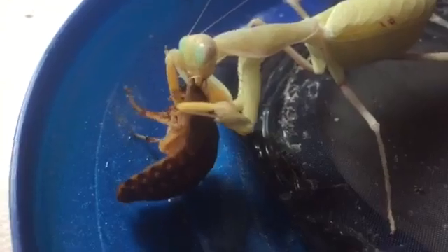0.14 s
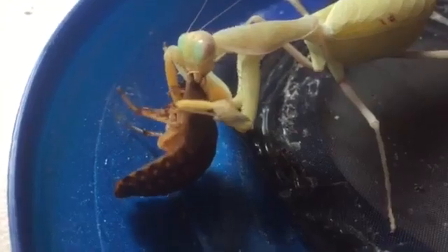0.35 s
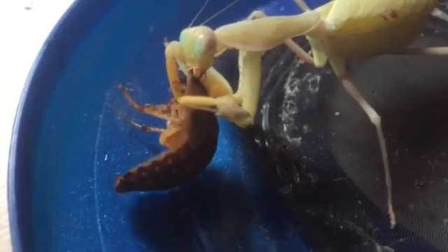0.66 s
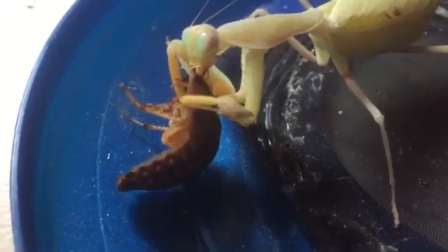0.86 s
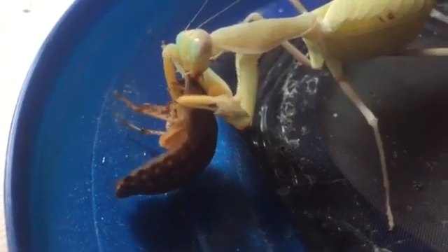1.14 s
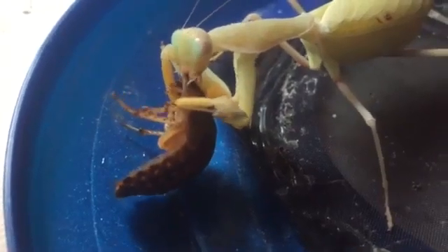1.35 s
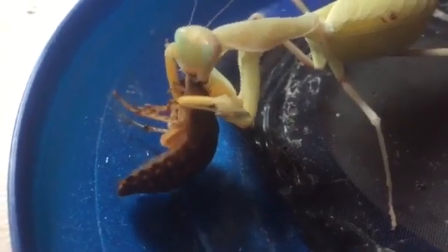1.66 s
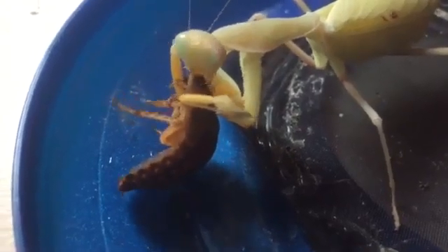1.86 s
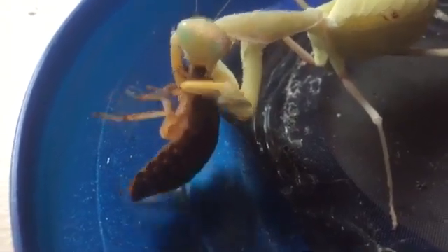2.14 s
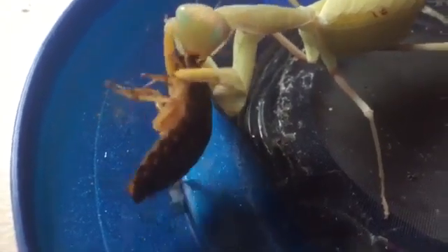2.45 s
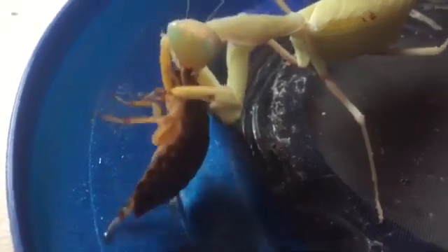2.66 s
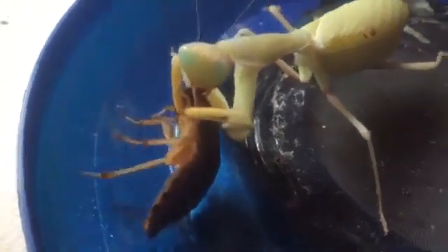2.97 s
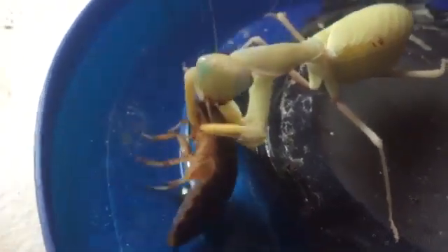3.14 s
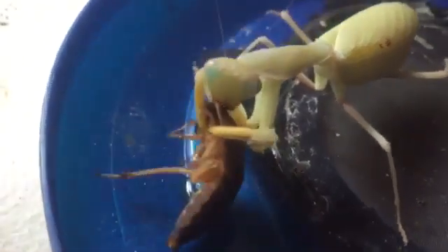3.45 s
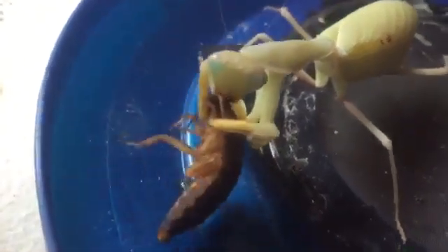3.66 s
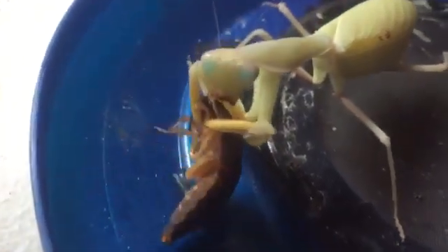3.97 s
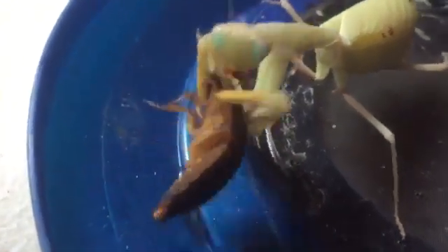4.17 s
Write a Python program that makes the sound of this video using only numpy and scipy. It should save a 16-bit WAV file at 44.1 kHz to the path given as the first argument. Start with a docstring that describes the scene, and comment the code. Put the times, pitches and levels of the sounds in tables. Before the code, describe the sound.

A mantis chews a struggling cockroach in a small plastic dish, captured very close in a quiet room. From the start to 0.25 seconds, several tiny, bright, brittle snaps come in quick succession; single ones follow near 0.5 and 0.75, then a small cluster at 1.1 to 1.2. Each is very short, with a slight ring of the dish. Until 2.2 only the background remains. Legs then tap and slip in a rapid flurry at 2.25 to 2.35, and again around 2.7, woodier and lower than the snaps. Sparse, very faint ticks follow; a dull soft table knock comes at 3.6. The loudest sharp cracks burst out at 3.85, followed by taps at 3.95 to 4.0 and one faint tick near 4.3. Faint grainy crackle swells around the clicks. A low, wavering rumble with uneven hum, a mid-range airy rush and thin microphone hiss run throughout.

```python
"""A mantis chews a struggling cockroach in a small plastic dish, heard from very close.
Bright snaps of breaking shell come first, ringing the dish briefly, with two dull knocks through the table;
after a pause legs tap and slip in quick flurries, then the loudest snaps lead to a last group of taps.
Throughout, random grains make a faint noise that rises around the clicks; filtered noise makes a mid-range
rush of air and microphone hiss, and a fluctuating sine with noise bands makes a low uneven rumble."""
import sys
import numpy as np
from scipy import signal
from scipy.fft import rfft, irfft, next_fast_len
from scipy.io import wavfile
from scipy.ndimage import uniform_filter1d

SR = 44100
rng = np.random.default_rng(int(sys.argv[2]) if len(sys.argv) > 2 else 0)


def generate_wav(sig):
    """Save sig (samples, or channels by samples) to the path in sys.argv[1] as 16-bit PCM at SR."""
    pcm = np.round(np.clip(np.atleast_2d(sig).T, -1, 1) * 32767).astype(np.int16)
    wavfile.write(sys.argv[1], SR, pcm)


def attenuation_scalar(level_db):
    """Turn a level in dB into a linear amplitude multiplier (20 dB per decade)."""
    decades = np.asarray(level_db, float) / 20
    return 10 ** decades


N = 190011

# jaws breaking shell: start_s, level_db, ring_hz, dish_db (relative to the crack)
SHELL_SNAPS = [(0.0626, -32, 10560, -15.5), (0.0687, -41.5, 6960, -17), (0.0924, -34, 9900, -35),
               (0.1424, -35.5, 11300, -18), (0.2424, -26.5, 12200, -21), (0.2515, -39, 9200, -10),
               (0.4661, -30.5, 10400, -21), (0.7561, -35, 9920, -25), (1.0828, -36.5, 11730, -9),
               (1.1634, -28.5, 11400, -34), (1.1656, -33, 9800, -17), (1.208, -43, 9180, -15),
               (1.2111, -47.5, 9430, -7), (2.2985, -42, 7400, -28), (2.3148, -44.5, 11100, -30),
               (2.6968, -31.5, 3480, -7), (2.6978, -35.5, 7650, -20), (2.877, -53, 12750, -6),
               (3.8436, -22.5, 9400, -15.5), (3.8437, -29, 12800, -25), (3.8527, -28, 8730, -30),
               (3.8814, -46, 9230, -22), (3.9921, -53, 6360, -22)]
# legs on the dish: start_s, level_db, favoured_hz, contact_ms, breadth_octaves (favour 6 dB down)
LEG_TAPS = [(2.239, -46, 3210, 2.16, 0.57), (2.2457, -40, 2800, 0.5, 0.38),
            (2.2619, -47.5, 4020, 0.44, 0.63), (2.2983, -32.5, 3350, 0.36, 0.32),
            (2.3045, -47, 4200, 1.1, 0.2), (2.3113, -45, 3900, 2.2, 0.2), (2.3146, -30, 3770, 1.15, 0.11),
            (2.3336, -52, 3360, 0.8, 0.33), (2.576, -52.5, 2490, 1.9, 0.81), (2.654, -59, 3517, 2.2, 0.32),
            (2.671, -43, 3190, 0.5, 0.21), (2.6925, -39, 5050, 2.7, 0.12), (2.6945, -36.5, 4000, 2.1, 0.25),
            (2.6958, -33, 3100, 1.1, 0.23), (2.6968, -42, 2050, 0.55, 0.3),
            (2.7972, -60.5, 2317, 0.55, 0.3), (3.2428, -55.5, 2580, 0.42, 0.49),
            (3.3856, -58, 4086, 9, 0.2), (3.5942, -47, 2330, 0.54, 0.96), (3.804, -55, 3270, 3.8, 0.37),
            (3.9318, -40, 2630, 0.93, 0.74), (3.934, -36, 4460, 3.6, 0.12), (3.937, -48, 4470, 1.8, 0.2),
            (3.9345, -37, 2400, 2.3, 0.18), (3.9384, -34, 2410, 2, 0.13), (3.9993, -37.5, 3050, 2.2, 0.09),
            (4.001, -50, 5900, 1.92, 0.14), (4.0049, -39, 3080, 1.3, 0.09), (4.286, -56, 2230, 0.57, 0.16)]
# free modes of the dish: mode_hz, mean_level_db, t60_s
DISH_MODES = [(2100, 1, 0.034), (2372, 5, 0.052), (3123, 3.5, 0.065), (3058, 2.5, 0.009), (3785, 5, 0.014),
              (4000, 9, 0.019), (4262, -1, 0.065), (5120, -7.5, 0.0067), (5050, 6.5, 0.034),
              (5900, 9, 0.014), (7400, 9, 0.02)]
# soft bumps through the table: start_s, level_db, favoured_hz
TABLE_KNOCKS = [(0.093, -60, 392), (1.213, -72, 960), (3.596, -44, 260.2)]
# modes of the table: mode_hz, level_db, t60_s
TABLE_MODES = [(252, 0, 0.085), (414, 2.5, 0.065), (556, 0, 0.053), (960, 11.5, 0.17)]
# uneven, sometimes abrupt level changes of two low noise bands: time_s, upper_level_db, drone_level_db
BAND_LEVELS = [(0.0, -52, -62), (0.14, -70, -69), (0.17, -60, -64), (1.26, -61.5, -64), (1.32, -57, -58),
               (1.7, -59, -58), (1.79, -64, -74), (1.84, -57, -62), (2.9, -61, -66), (3.56, -60.5, -60.5),
               (3.6, -56, -52.5), (3.68, -57.5, -73), (3.73, -67, -53.5), (3.83, -56, -68.5),
               (3.86, -69, -61), (4.06, -50, -57), (4.09, -57, -69), (4.31, -57.5, -66)]
# chance fluctuations of a narrow low rumble near 76 Hz: time_s, rms_db, pitch_hz, half_width_s (to 1/e)
RUMBLE_FLUCTUATIONS = [(0.03, -50, 84, 0.09), (0.12, -46, 83, 0.027), (0.34, -48, 82.25, 0.047),
                       (0.502, -44.5, 73.65, 0.016), (0.601, -43, 80.3, 0.038),
                       (0.759, -44.5, 78.24, 0.017), (0.83, -44.5, 79.8, 0.024), (1.021, -48, 80.24, 0.029),
                       (1.22, -48, 80.6, 0.062), (1.43, -53, 82.6, 0.15), (1.63, -50, 73.5, 0.044),
                       (1.759, -47.5, 77.15, 0.048), (1.89, -51, 81.17, 0.05), (2.03, -47.5, 70.4, 0.037),
                       (2.16, -47, 69.8, 0.044), (2.251, -47.5, 76.45, .04), (2.351, -46.5, 71.9, 0.037),
                       (2.44, -46, 72.87, 0.02), (2.511, -47.5, 72.8, 0.045), (2.711, -51, 79.33, 0.036),
                       (2.891, -45, 75.9, 0.029), (2.99, -52, 77.5, 0.073), (3.16, -55, 85, .05),
                       (3.33, -46, 73.8, 0.031), (3.43, -53.5, 70.7, .05), (3.56, -55.5, 69.2, 0.066),
                       (3.73, -54.5, 69.4, 0.095), (3.91, -49, 72.3, 0.048), (4.06, -51.5, 72.4, 0.062),
                       (4.2, -54, 74, .08)]
# relative noise spectra, each: frequency_hz, density_db (per Hz)
RUMBLE_SPECTRUM = [(9.4, -42), (16, -16), (27, -19), (40, -14), (50, -2), (58, -1.5), (70, 7), (86, -2.5),
                   (110, -4), (140, -25.5), (240, -120)]
UPPER_SPECTRUM = [(62, -63), (105, -3), (113, -1.5), (175, -4), (230, -42.5), (390, -120)]
DRONE_SPECTRUM = [(110, -37), (180, 1.5), (205, 4), (290, -12), (380, -37), (640, -120)]
AIR_SPECTRUM = [(160, -42), (280, -4), (316, -3.5), (395, -7), (437, -7.5), (603, -7.5), (797, -1.5),
                (1290, -7.5), (1410, -11.5), (1640, -13), (1920, -14.5), (4000, -19.5), (5200, -37),
                (8800, -120)]
HISS_SPECTRUM = [(2350, -14), (4000, -0.5), (4830, -2.5), (5450, 0), (6480, -1), (7870, -6), (9670, -3.5),
                 (10500, -20), (11500, -5.5), (12700, -8.5), (15800, -7.5)]


def snaps(scatter_db=-13, scatter_ms=1.0, edge_db=-6):
    """Impulsive fracture: a break rings the shell, and the dish walls scatter the crack back."""
    out, t = np.zeros(N), np.arange(1024) / SR
    click = 1. * (t == 0)
    for start_s, level_db, ring_hz, dish_db in SHELL_SNAPS:
        noise = rng.standard_normal(len(t))
        draws = rng.standard_normal((len(DISH_MODES), 2))
        # two resonances in series give a rounded onset
        shell = peak_one(ring(ring(click, ring_hz, 0.0009), ring_hz, 0.0006))
        edge = peak_one(np.roll(band(click, 7500, 16900), 3))   # three samples late
        crack = shell + attenuation_scalar(edge_db) * edge
        walls = noise * (t > 0.0005) * np.exp(-t * 1000 / scatter_ms)
        scattered = signal.fftconvolve(crack, walls)[:len(t)]
        dish_ring = dish(t, 3100, 0.75, draws)
        dish_ring = dish_ring * np.exp(-t / 0.0018) * np.minimum(t / 0.000047, 1)   # damped; short onset
        snap = peak_one(crack) + attenuation_scalar(scatter_db) * peak_one(scattered) + attenuation_scalar(dish_db) * dish_ring
        add(out, start_s, attenuation_scalar(level_db) * snap)
    return above(out, 2600)


def taps(damp_ms=2.3, linger_db=-26, rough=0.75, release_ms=0.97):
    """Frictional contact: a claw slips with growing, uneven force, lets go, and bodies damp the dish ring."""
    scratch_db = -16.5   # relative to the ring
    skip_gap_ms, skip_loss_db, skip_step_db = 5.5, 22, 11   # mean gap, first loss, further loss per skip
    out, t = np.zeros(N), np.arange(3072) / SR
    for start_s, level_db, favoured_hz, contact_ms, breadth in LEG_TAPS:
        slip_noise, scratch_noise = rng.standard_normal((2, len(t)))
        draws = rng.standard_normal((len(DISH_MODES), 2))
        after_ms = np.maximum(t * 1000 - contact_ms, 0)
        force = np.sin(np.pi / 2 * np.minimum(t * 1000 / max(contact_ms, 0.1), 1)) ** 2
        slow_noise = uniform_filter1d(uniform_filter1d(slip_noise, size=40), size=40)
        uneven = 1 + rough * rms_one(slow_noise)
        damping = np.exp(-after_ms / damp_ms) + attenuation_scalar(linger_db)
        rung = dish(t, favoured_hz, breadth, draws) * force * uneven * damping
        scratch = peak_one(band(force * np.exp(-after_ms / release_ms) * scratch_noise, 3000, 9200))
        add(out, start_s, attenuation_scalar(level_db) * (peak_one(rung) + attenuation_scalar(scratch_db) * scratch))
        # the claw scratches on three times, ever weaker
        for k, gap in enumerate(np.cumsum(0.5 + rng.random(3))):
            skip = attenuation_scalar(level_db - skip_loss_db - skip_step_db * k) * scratch
            add(out, start_s + gap * skip_gap_ms / 1000, skip)
    return above(out, 1580)


def dish(t, favoured_hz, breadth, draws, octave_db=-13):
    """Modal superposition: the contact point favours modes near one pitch and, weaker, near its octave."""
    out = 0
    for (hz, level_db, t60), (level_draw, phase_draw) in zip(DISH_MODES, draws):
        octaves = np.log2(hz / favoured_hz)
        favour = attenuation_scalar(-6 * (octaves / breadth) ** 2) + attenuation_scalar(octave_db - 6 * ((octaves - 1) / 0.2) ** 2)
        decay = attenuation_scalar(level_db + 2 * level_draw - 60 * t / t60)   # mode levels vary by chance, 2 dB sd
        out = out + favour * decay * np.sin(2 * np.pi * hz * t + 20 * phase_draw)
    return peak_one(out)


def room(x):
    """Diffuse reverberation: convolution with noise that dies away exponentially."""
    t60_s = 0.15
    t = np.arange(int(0.4 * SR)) / SR
    tail = band(rng.standard_normal(len(t)), 1300, 8200) * attenuation_scalar(-60 * t / t60_s) * (t > 0.002)
    return signal.fftconvolve(x, tail / np.sqrt(np.sum(tail ** 2)))[:N]


def grainy_noise(grains_per_s=7000, spread_db=2.0):
    """Random impulse noise: faint uneven grains that rise around clicks, dull at taps and bright at snaps."""
    grains = attenuation_scalar(spread_db * rng.exponential(1, (2, N))) * rng.standard_normal((2, N))
    grains = grains * (rng.random((2, N)) < grains_per_s / SR) + 1e-18
    dull = rms_one(band(grains[0], 1800, 6500))
    bright = rms_one(band(grains[1], 6500, 14000))
    # the dull part fades after each tap, the bright part stops at once after each snap
    dull_level = level_around(LEG_TAPS, rest_db=-88.5, rise_db=-78, share=0.9, lead_s=0.09, fade_s=0.09)
    bright_level = level_around(SHELL_SNAPS, rest_db=-83.5, rise_db=-74.5, share=-0.04, lead_s=0.04, fade_s=1e-9)
    return dull_level * dull + bright_level * bright


def level_around(events, rest_db, rise_db, share, lead_s, fade_s):
    """Summed powers: a level rises exponentially before each click and falls exponentially after it."""
    t = np.arange(0, N, 32) / SR
    power = attenuation_scalar(2 * rest_db)
    for start_s, level_db, *_ in events:
        # rise_db holds for a click of -35 dB; share is how much of the click's dB it follows
        height = attenuation_scalar(2 * (rise_db + share * (level_db + 35)))
        distance = np.maximum((start_s - t) / lead_s, (t - start_s) / fade_s)
        power = power + height * np.exp(-2 * distance)
    return np.interp(np.arange(N) / SR, t, np.sqrt(power))


def knocks():
    """Modal excitation: a soft bump rings the table most in the modes near its favoured pitch."""
    out, push = np.zeros(N), 1. * (np.arange(8192) == 0)
    for start_s, level_db, favoured_hz in TABLE_KNOCKS:
        for hz, mode_db, t60 in TABLE_MODES:
            favour_db = -10 * np.log2(hz / favoured_hz) ** 2
            add(out, start_s, attenuation_scalar(level_db + mode_db + favour_db) * ring(push, hz, t60))
    return out


def low_rumble():
    """Low-frequency noise: a narrow rumble's chance fluctuations, drawn as a sine, among three noise bands."""
    lull_db, rumble_db = -68.5, -52   # lull_db is the resting level of the narrow rumble
    t = np.arange(N) / SR
    time_s, rms_db, pitch_hz, width_s = np.transpose(RUMBLE_FLUCTUATIONS)
    level = attenuation_scalar(lull_db)
    for at, db, width in zip(time_s, rms_db, width_s):
        level = level + attenuation_scalar(db) * np.exp(-((t - at) / width) ** 2)
    phase = 2 * np.pi * np.cumsum(np.interp(t, time_s, pitch_hz)) / SR
    narrow = level * np.sqrt(2) * np.sin(phase)
    rumble = attenuation_scalar(rumble_db) * coloured(RUMBLE_SPECTRUM)
    time_s, upper_db, drone_db = np.transpose(BAND_LEVELS)
    upper = uneven_band(UPPER_SPECTRUM, np.interp(t, time_s, upper_db), steady=0.28, span_s=0.2)
    drone = uneven_band(DRONE_SPECTRUM, np.interp(t, time_s, drone_db), steady=0.27, span_s=0.11)
    return narrow + rumble + upper + drone


def uneven_band(spectrum, level_db, steady, span_s):
    """Narrow-band fluctuation: the noise's own swells are partly evened, then a level curve is imposed."""
    x = coloured(spectrum)
    span = int(span_s * SR)
    swell = np.sqrt(uniform_filter1d(uniform_filter1d(x ** 2, span), span) + 0.032)
    return attenuation_scalar(level_db) * rms_one(x / swell ** steady)


def air():
    """Broadband flow noise: a steady rush strongest in the middle frequencies."""
    return attenuation_scalar(-68.5) * coloured(AIR_SPECTRUM)


def hiss():
    """Random self-noise of the microphone: steady noise in the treble."""
    return attenuation_scalar(-78) * coloured(HISS_SPECTRUM)


def coloured(spectrum):
    """Spectral shaping: white noise filtered to the given density, straight in dB over log frequency."""
    size = next_fast_len(N)
    hz = np.maximum(np.arange(size // 2 + 1) * SR / size, 1)
    point_hz, point_db = np.transpose(spectrum)
    density_db = np.interp(np.log(hz), np.log(point_hz), point_db, -120, -120)
    return rms_one(irfft(rfft(rng.standard_normal(size)) * attenuation_scalar(density_db), size)[:N])


def ring(x, hz, t60):
    """Damped resonance: a unit click sets off a decaying sine of initial height 1."""
    radius, angle = attenuation_scalar(-60 / (t60 * SR)), 2 * np.pi * hz / SR
    return signal.lfilter([0, np.sin(angle)], [1, -2 * radius * np.cos(angle), radius ** 2], x)


def band(x, low_hz, high_hz):
    """Band limitation by a causal band-pass."""
    sos = signal.butter(2, [low_hz, min(high_hz, 0.45 * SR)], "band", fs=SR, output="sos")
    return signal.sosfilt(sos, x)


def above(x, low_hz):
    """Inefficient bass radiation of small bodies, as a steep high-pass."""
    return signal.sosfilt(signal.butter(6, low_hz, "high", fs=SR, output="sos"), x)


def rms_one(x):
    """Power normalisation to unit rms."""
    return x / np.sqrt(np.mean(x ** 2) + 1e-20)


def peak_one(x):
    """Amplitude normalisation to unit peak."""
    return x / (np.abs(x).max() + 1e-20)


def add(out, start_s, x):
    """Superposition of a short sound at its start time."""
    i = round(start_s * SR)
    out[i:i + len(x)] += x[:len(out) - i]


def scene():
    """Superposition of close clicks, their reverberation, grainy noise, knocks and the background."""
    jaws, legs = snaps(), taps()
    tail = room(attenuation_scalar(-19) * jaws + attenuation_scalar(-20) * legs)
    floor = low_rumble() + air() + hiss()
    return (jaws + legs + tail + grainy_noise() + knocks() + floor)[None]


def band_limit(x):
    """A steep low-pass at the top of the band."""
    return signal.sosfilt(signal.butter(12, 16880, fs=SR, output="sos"), x)


def record(dry):
    """Band limitation: a steep low-pass, 60 dB down from 17 kHz, cuts the top."""
    mix = signal.sosfilt(signal.cheby2(12, 60, 17000, fs=SR, output="sos"), dry)
    return band_limit(mix)


dry = scene()
out = record(dry)
generate_wav(out)
```